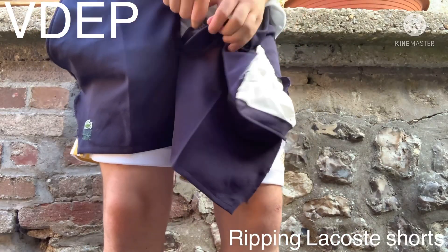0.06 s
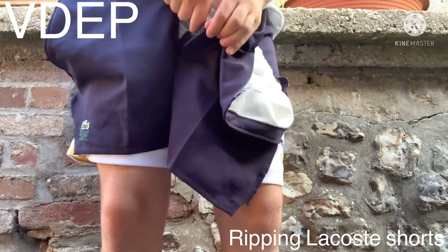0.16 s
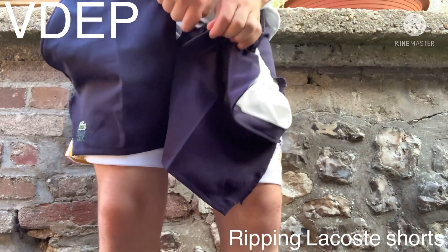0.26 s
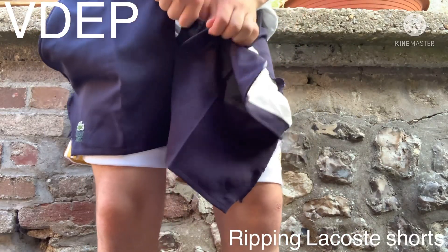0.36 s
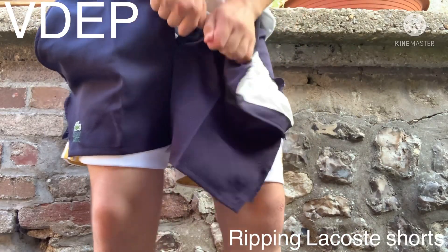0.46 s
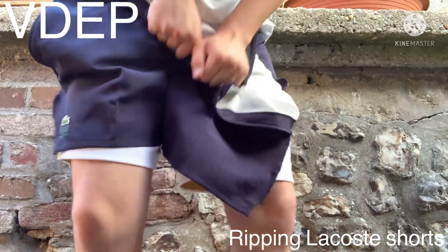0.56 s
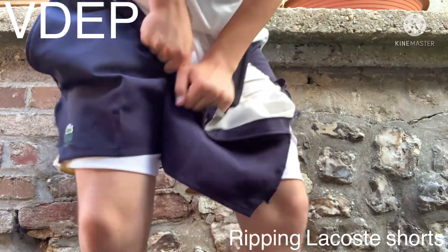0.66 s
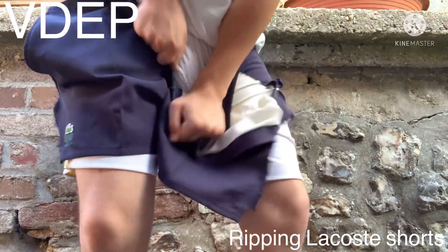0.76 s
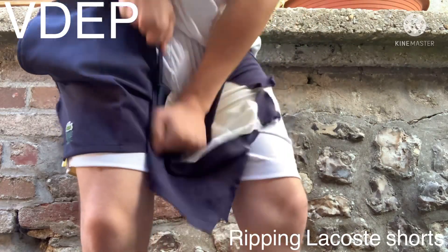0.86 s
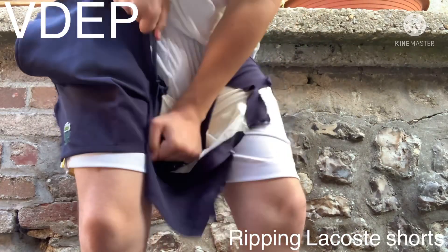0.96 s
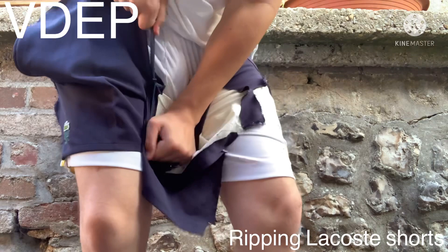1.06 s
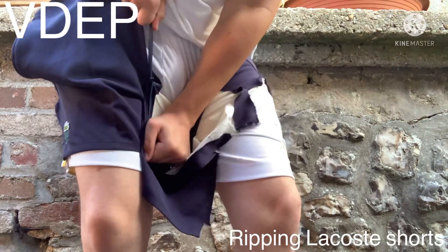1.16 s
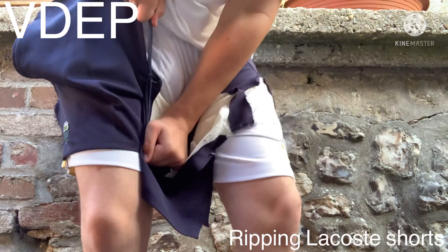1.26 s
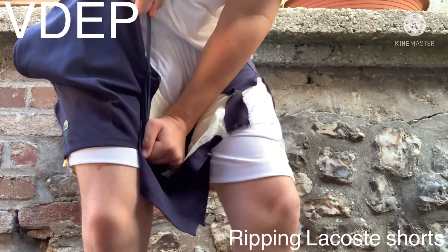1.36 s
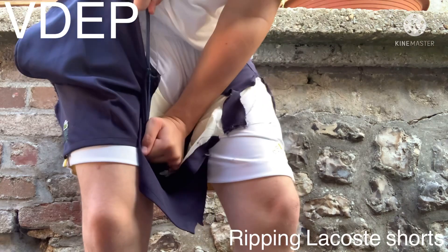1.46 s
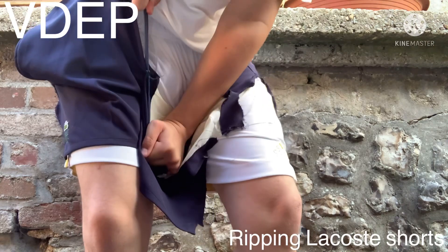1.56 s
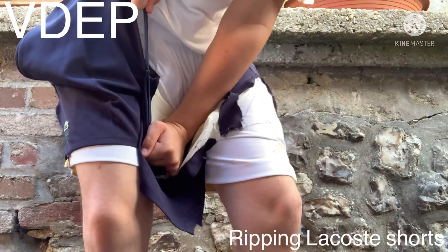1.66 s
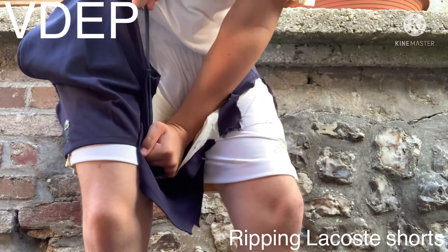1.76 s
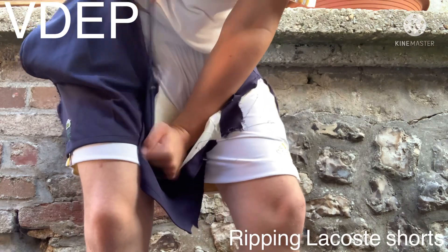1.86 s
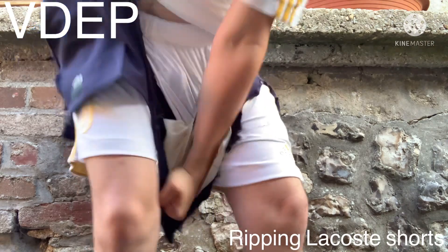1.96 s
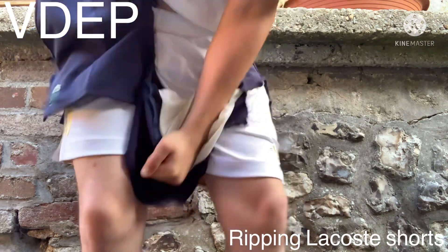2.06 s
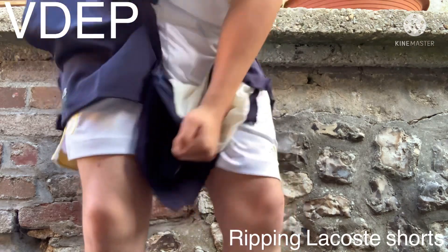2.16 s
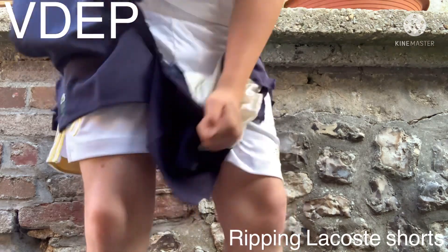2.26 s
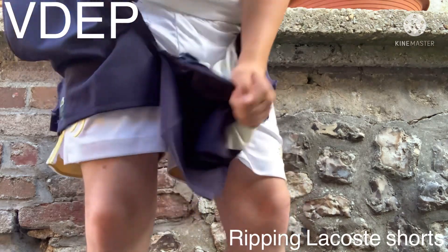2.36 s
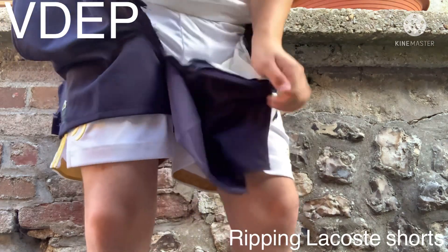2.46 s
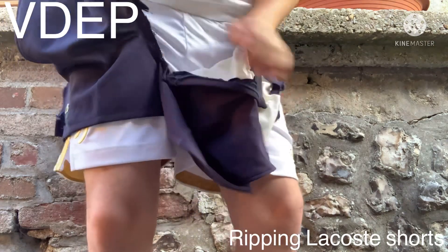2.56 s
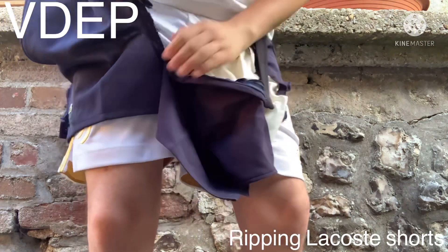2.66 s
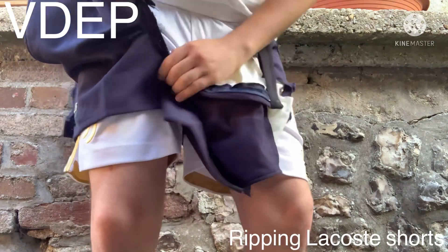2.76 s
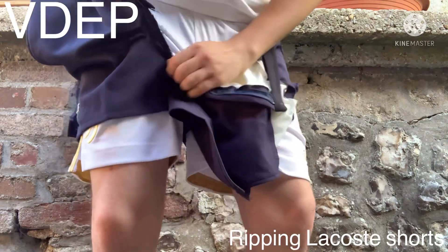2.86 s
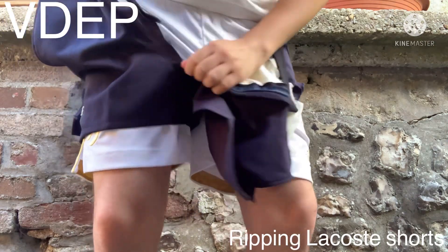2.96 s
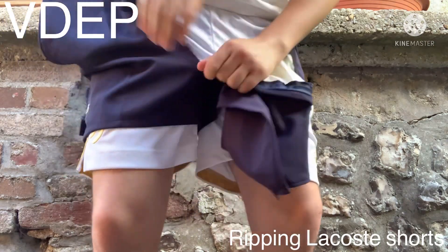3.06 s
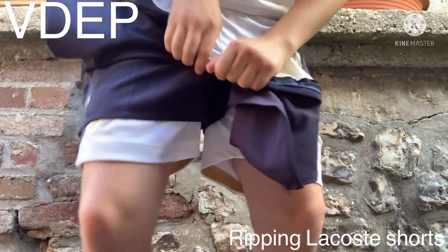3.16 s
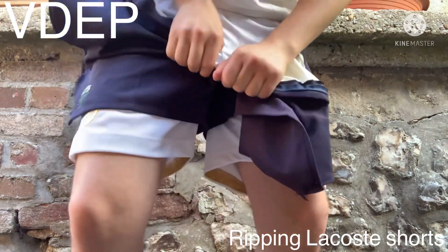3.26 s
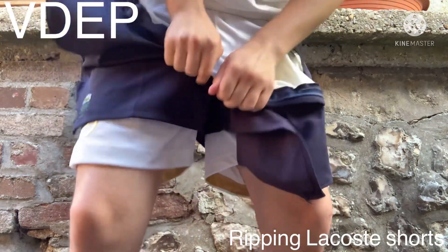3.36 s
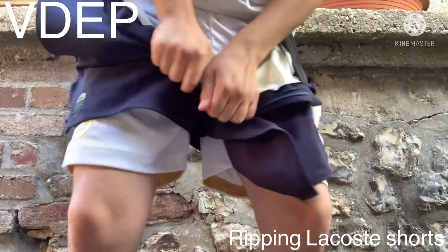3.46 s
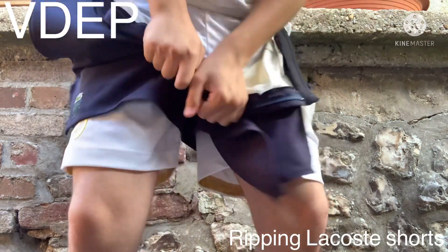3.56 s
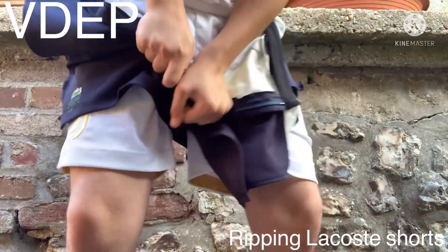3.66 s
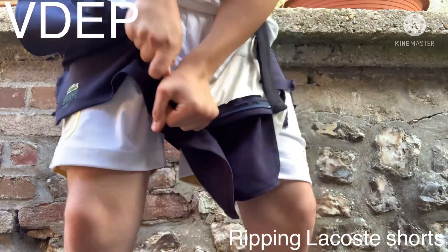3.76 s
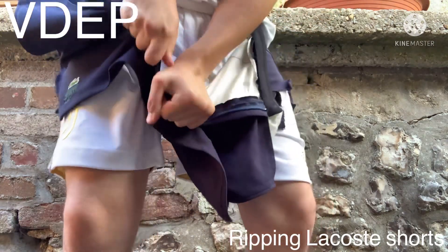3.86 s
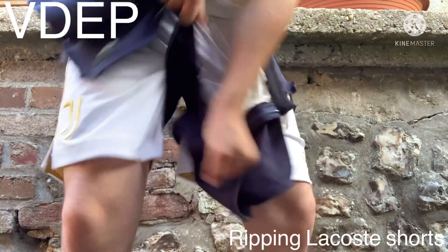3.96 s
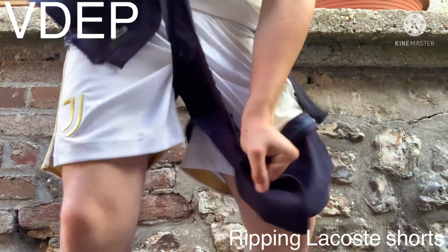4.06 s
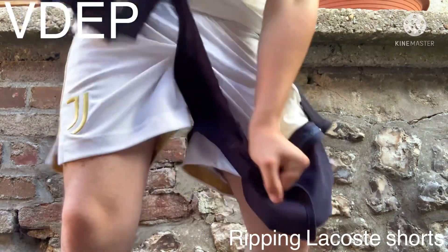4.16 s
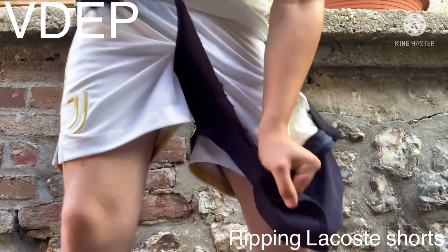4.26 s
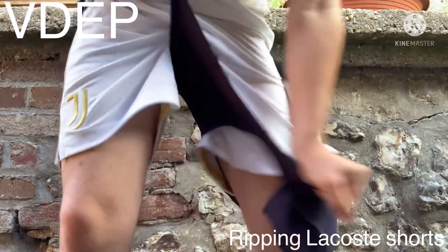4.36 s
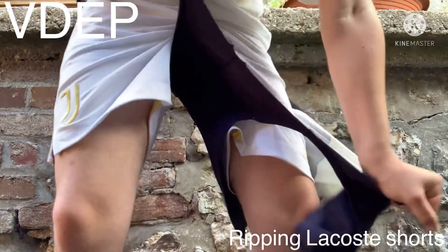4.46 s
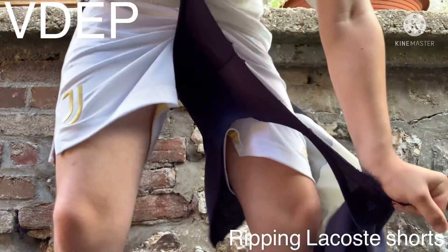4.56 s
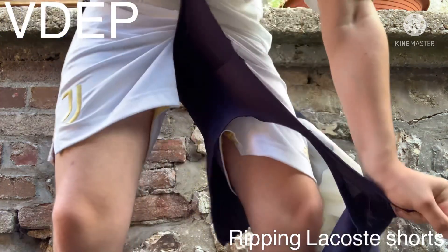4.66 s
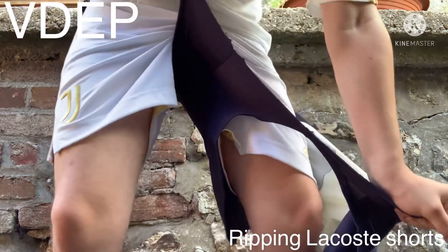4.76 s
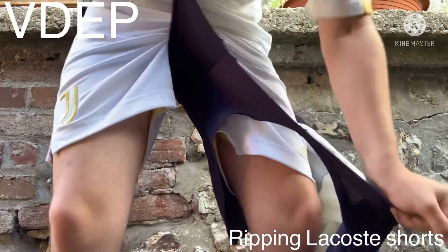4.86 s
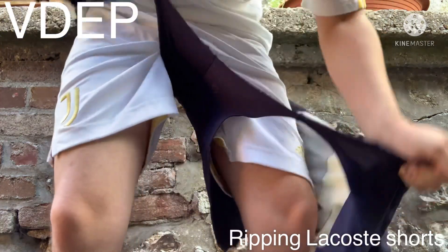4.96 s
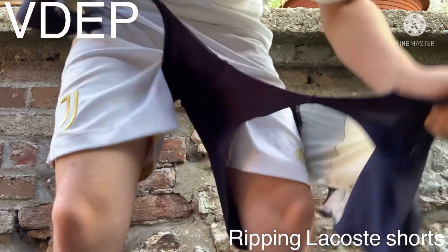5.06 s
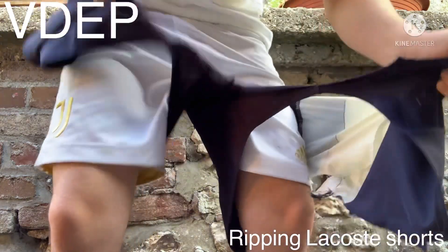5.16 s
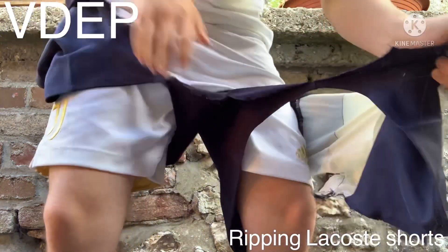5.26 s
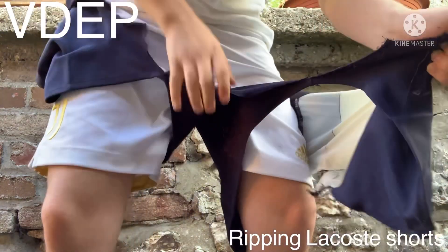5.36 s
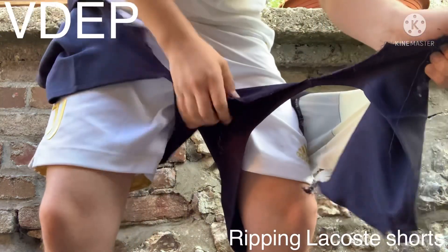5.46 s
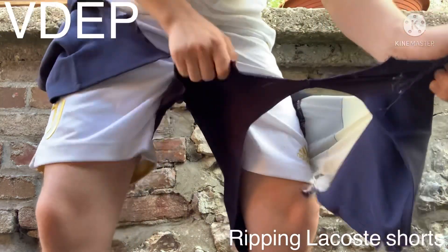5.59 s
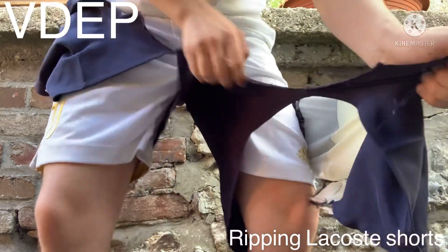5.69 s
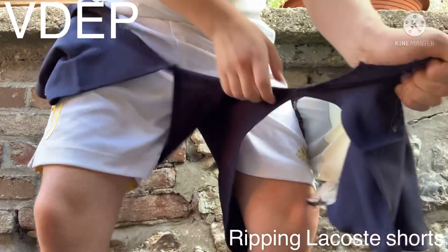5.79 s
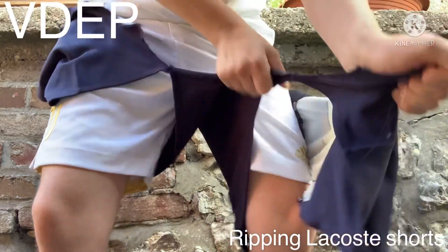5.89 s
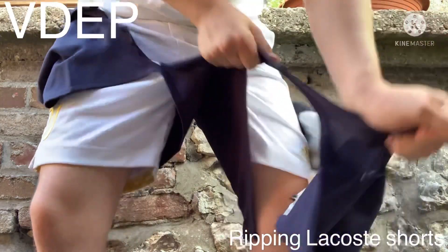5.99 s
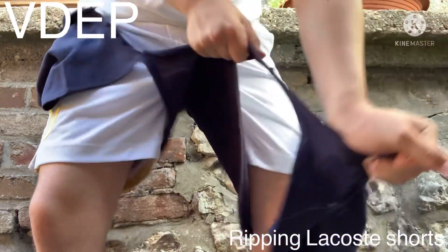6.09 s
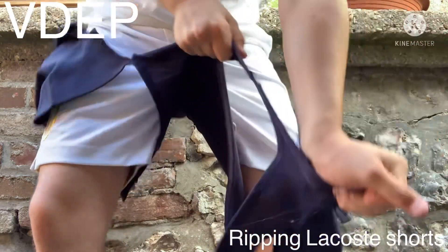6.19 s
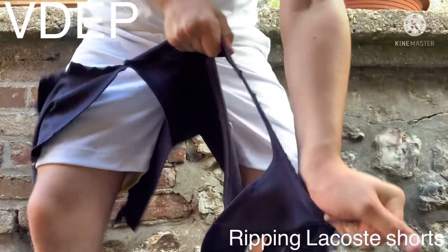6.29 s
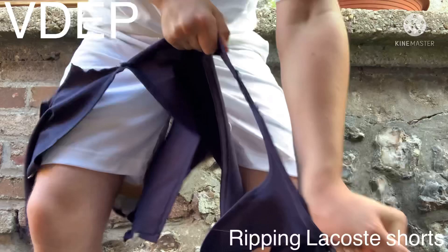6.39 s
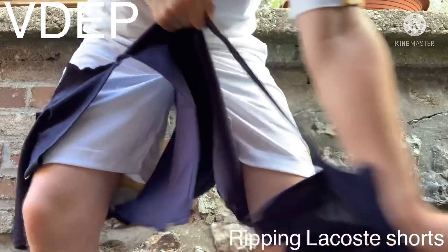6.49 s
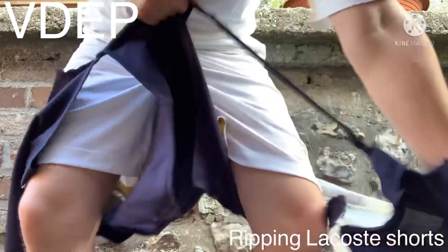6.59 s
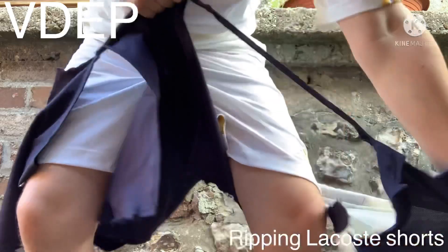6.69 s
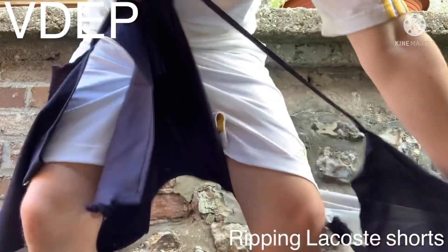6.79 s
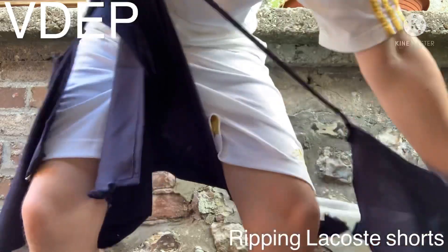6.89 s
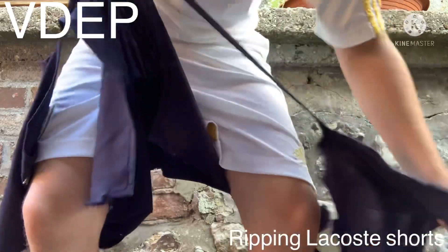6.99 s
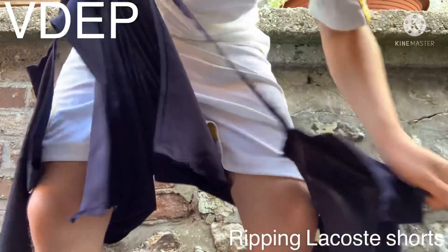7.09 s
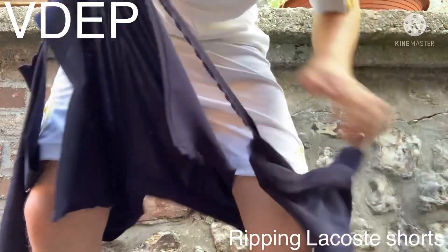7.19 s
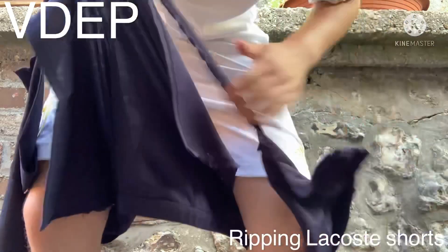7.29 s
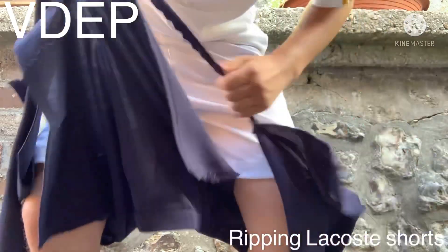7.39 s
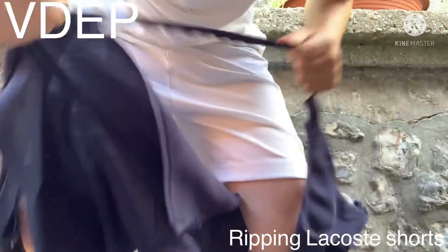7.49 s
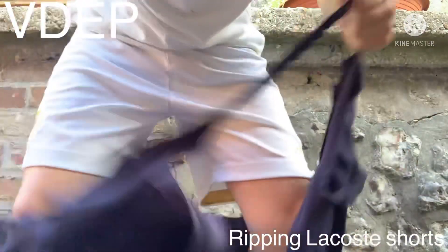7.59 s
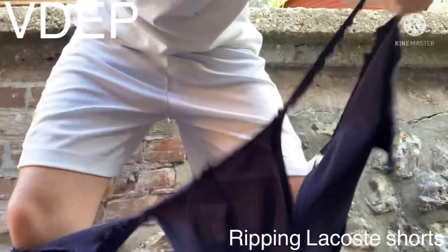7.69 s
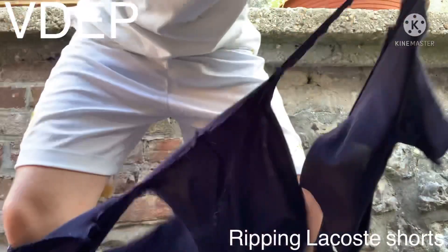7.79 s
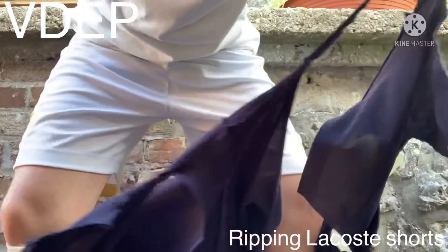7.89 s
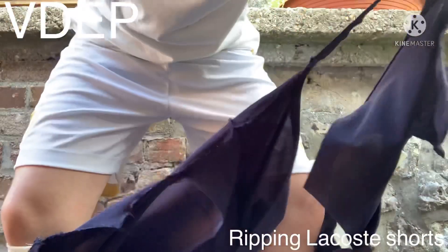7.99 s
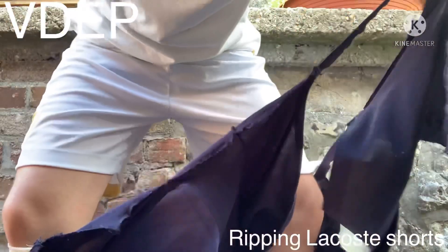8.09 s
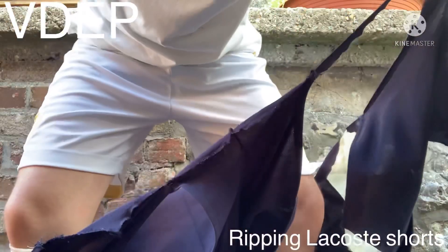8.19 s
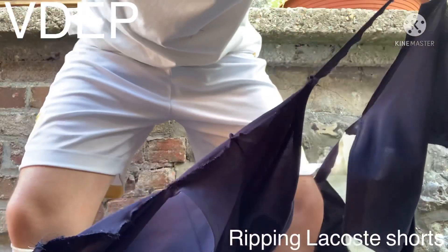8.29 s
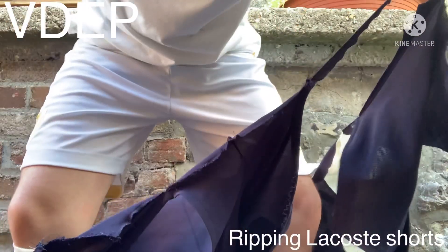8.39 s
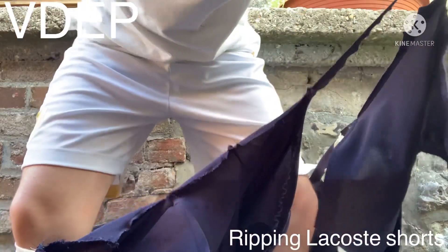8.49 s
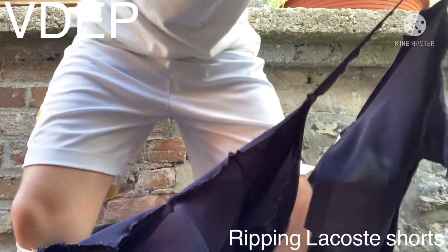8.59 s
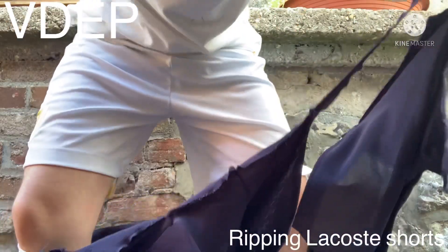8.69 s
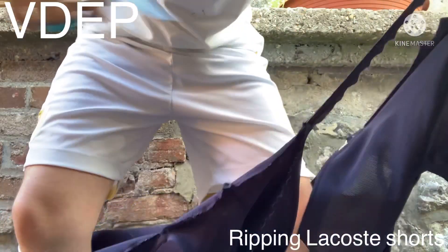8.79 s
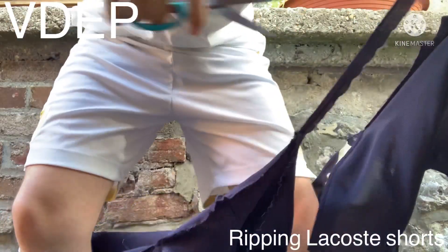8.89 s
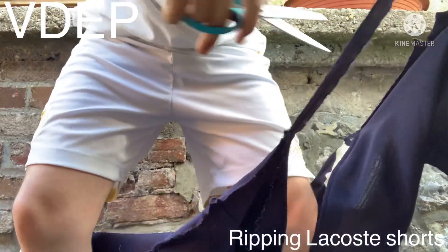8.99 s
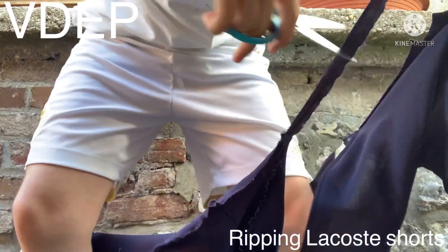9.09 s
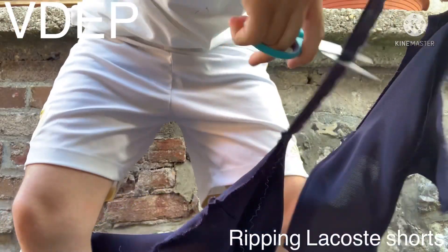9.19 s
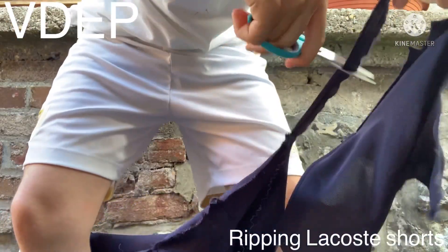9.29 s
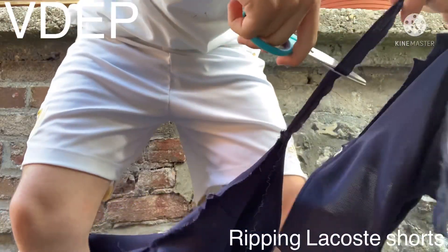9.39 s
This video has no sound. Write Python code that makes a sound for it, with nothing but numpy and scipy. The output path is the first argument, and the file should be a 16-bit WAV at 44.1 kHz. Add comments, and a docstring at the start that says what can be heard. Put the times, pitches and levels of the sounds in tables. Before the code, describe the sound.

Close fabric tearing, quick popping threads with low cloth booms and rustles, a distant engine droning, ending in dull fumbling and metal clicks.

```python
"""A far bird hoots over faint traffic and a distant engine's drone as shorts begin to tear, close by.
Threads snap one by one or in fast runs: each is a short puff of noise, and the taut cloth twangs in
a quick falling chirp. Jerked cloth booms low and soft strokes rustle. Then a hand on the left fumbles
for scissors: dull noise knocks, low thumps, a grainy drag and bright steel clinks. A stone wall and
the yard scatter the near sounds, which reach the two ports of a microphone."""
import sys
import numpy as np
from scipy import signal
from scipy.fft import rfft, irfft
from scipy.io import wavfile
from scipy.ndimage import uniform_filter1d

SR = 44100
rng = np.random.default_rng(int(sys.argv[2]) if len(sys.argv) > 2 else 0)


def dump(signal):
    """Clip the signal to [-1, 1] and save it as 16-bit WAV at the path in sys.argv[1]."""
    limited = np.clip(np.atleast_2d(signal).T, -1, 1)
    pcm = np.round(limited * 32767).astype(np.int16)
    wavfile.write(sys.argv[1], SR, pcm)


N = 416304  # length of the sound in samples
HZ, TIME = np.fft.rfftfreq(N, 1 / SR), np.arange(N) / SR
EDGE_HZ = 16200  # top of the frequency range here


def amp(db):
    """Turns decibels into a gain."""
    return 10 ** (np.asarray(db) / 20)


def evened(x):
    """Scales a signal to an rms (average strength) of 1."""
    return x / np.sqrt(np.mean(x ** 2) + 1e-20)


def read(points):
    """Spreads a table of (Hz, value) over all frequencies."""
    hz, value = np.transpose(points)
    return np.interp(np.log(HZ + 1), np.log(hz + 1), value)


def follow(rows, t):
    """Reads the columns of a curve at the times t."""
    s, *columns = np.transpose(rows)
    return [np.interp(t, s, c) for c in columns]


def add(mix, s, sound):
    """Mixes a sound in at s seconds."""
    part = mix[:, round(s * SR):][:, :sound.shape[-1]]
    part += sound[..., :part.shape[1]]


def band(x, lo_hz, hi_hz, order=2):
    """Band-pass filter that keeps the power of white noise."""
    hi_hz = min(hi_hz, SR / 2 - 1)
    sos = signal.butter(order, [lo_hz, hi_hz], "band", fs=SR, output="sos")
    return signal.sosfilt(sos, x) * np.sqrt(SR / 2 / (hi_hz - lo_hz))


def coloured(x, spectrum):
    """Shapes x with a table of (Hz, dB), then scales it to rms 1."""
    return evened(irfft(rfft(x) * amp(read(spectrum)), N))


def noise(size=N):
    """White noise, unrelated at the two ports."""
    return rng.standard_normal((2, size))


def burst(rise, decay, size=3000):
    """A puff of noise with the energy of a 2 ms sound at rms 1; rise and decay in seconds."""
    t = np.arange(size) / SR
    puff = noise(size) * (1 - np.exp(-t / rise)) * np.exp(-t / decay)
    return evened(puff) * np.sqrt(.002 * SR / size)


def threads(rows):
    """Each break gives a tick, a crack and a flutter of the weave (diffuse), and a twang (direct)."""
    # Resonances of the held cloth and cupped fists.
    # Each row: centre in Hz, width in Hz, relative level in dB.
    cloth = [(860, 160, 1), (1620, 650, -2.5), (2880, 200, -14), (4100, 360, -15.5)]
    tick_s, crack_s = 0.00041, 0.00097  # decay of an ordinary break
    thickness = 0.3  # thick threads twang harder and part more slowly
    tick, crack, edge, flutter, flap, ring = np.zeros((6, 2, N))
    for s, crack_db, tick_db, twang_db, hz in rows:
        thick = amp(thickness * max(twang_db + 38, 0))
        add(tick, s, amp(crack_db + tick_db) * burst(rise=.0001, decay=tick_s * thick))
        puff = amp(crack_db) * reflected(burst(rise=0.0002, decay=crack_s * thick))
        add(crack, s, puff)
        add(edge, s, amp(0.35 * tick_db) * puff)  # the bright half follows the tick's level
        shake = amp(twang_db) * min(700 / hz, 1)  # a tighter patch moves less cloth
        add(flutter, s, shake * burst(rise=0.00023, decay=0.0018))
        add(flap, s, shake * burst(rise=0.0037, decay=0.016))
        add(ring, s, amp(twang_db + 5) * twang(hz))
    body = sum(amp(db) * band(flutter, hz - width / 2, hz + width / 2, order=1)
               for hz, width, db in cloth)
    slack = amp(-13) * band(flap, 110, 640) + amp(-9) * band(flap, 150, 280)
    split = amp(-9.0) * band(crack, 1200, 2700) - amp(-6.0) * band(edge, 2700, 6100)
    return band(tick, 6300, 16000) + split + body + slack, ring


def reflected(puff, share=0.65, longest=0.0008):
    """A quick echo, as off fists and folds, gives each snap or knock its own hollow colour."""
    lag = round(rng.uniform(0.064, 1) * longest * SR)
    echo = np.pad(puff, ((0, 0), (lag, 0)))[:, :puff.shape[1]]
    return (puff + share * echo) / np.sqrt(1 + share ** 2)


def twang(hz, sharpness=2.5, size=3000):
    """In taut cloth short waves arrive first: a falling chirp, a little earlier at the right port."""
    crest_cycles = 2.2  # periods until the chirp is loudest
    end = 0.93  # final pitch as a share of hz
    glide, settle = 2.3, 0.4  # extra pitch at the start, in hz; its decay as a share of the time to the crest
    left_delay = rng.uniform(0, 0.00025)
    t = np.maximum(np.arange(size) / SR - [[left_delay], [0]], 0)
    u = t * hz / crest_cycles
    turns = crest_cycles * (end * u + glide * settle * (1 - np.exp(-u / settle)))
    return np.sin(2 * np.pi * (turns + rng.random())) * (u * np.exp(1 - u)) ** sharpness


def weave(start, length, crest, crack_db, tick_db, twang_db, change_db, per_s=520, spread_db=5.0):
    """In a run, fine threads of uneven strength break at a rate of hundreds a second."""
    rise_db, fade_db = 3.5, 13.5  # a run swells to its crest and dies away
    s = np.arange(0, length, 1 / per_s)
    u, crest = s / length, np.clip(crest, .01, .99)
    late, strong, tight = rng.standard_normal((len(s), 3)).T
    swell_db = -rise_db * np.maximum(1 - u / crest, 0)
    swell_db = swell_db - fade_db * np.maximum((u - crest) / (1 - crest), 0) ** 0.69
    strength_db = swell_db + spread_db * np.clip(strong, -2, 1.6)
    # the same columns as a table of single snaps
    return np.transpose([start + s + .3 * late / per_s,
                         crack_db + strength_db,
                         np.full(len(s), tick_db),
                         twang_db + strength_db + change_db * (u - .5),
                         740 * np.exp(.3 * tight)])


def fibres(rows, count=3):
    """A thread is a bundle: weaker single fibres give around it, most of them just after."""
    spread_s, fibre_db, fibre_twang_db = 0.012, -14, -15  # time spread, and levels against the thread
    s, crack_db, tick_db, twang_db, hz = np.repeat(rows, count, axis=0).T
    late, strong = rng.random((len(s), 2)).T
    return np.transpose([s + spread_s * (late - .22),
                         crack_db + fibre_db + 8 * (strong - .6),
                         tick_db - 3,
                         twang_db + fibre_twang_db,
                         hz])


def jerks_and_thumps(glide=0.82, settle=0.0021, rise=0.0017, size=9000):
    """Low booms and thumps sound like a slack drum skin: fading tones whose pitch drops at once."""
    # Low booms of the jerked cloth, and low thumps as the hand fumbles.
    # Each row: start in seconds, level in dB, settled pitch in Hz, time to fade by 60 dB in seconds.
    booms = [(0.8562, -19, 209, 0.087), (0.8966, -23, 280, 0.13), (1.192, -21, 213, 0.039),
             (1.881, -12, 226, 0.04), (4.313, -19.5, 314, 0.027), (4.356, -15, 375, 0.017),
             (4.381, -18.5, 318, 0.025), (8.032, -23.5, 140, 0.09), (8.136, -24, 227.3, 0.063),
             (8.165, -27, 92, 0.25), (8.219, -23, 265, 0.057)]
    out, t = np.zeros((2, N)), np.arange(size) / SR
    for s, db, hz, t60 in booms:
        turns = hz * (t + glide * settle * (1 - np.exp(-t / settle)))
        add(out, s, amp(db - 60 * t / t60) * (1 - np.exp(-t / rise)) * np.sin(2 * np.pi * turns))
    return out


def swish():
    """Loose cloth swings once, fluttering, with a faint narrow whistle perhaps from a car's tyres."""
    middle_s, length_s, level_db = 7.22, 0.56, -57
    swing = np.cos(np.pi * np.clip((TIME - middle_s) / length_s, -.5, .5)) ** 2
    flutter = amp(2.8 * evened(band(noise(), 7.2, 40))[0])
    air = band(noise(), 980, 1580)
    whistle = amp(-7.5) * band(noise(), 2330, 2470)  # perhaps the tyres of a passing car
    return amp(level_db) * swing * flutter * (air + whistle)


def fumbling():
    """Dull knocks with a hard clack on top, and the grainy drag of the scissors over their ledge."""
    # Knocks of the hand. Each row: start in seconds, clack level in dB, body level in dB,
    # body pitch in Hz, thump level in dB (all levels before the mix below).
    knocks = [(7.9011, -14, -20.5, 646, -27), (7.937, -45, -35, 500, -30), (7.955, -25.5, -27, 594, -29),
              (7.99, -23, -46, 950, -29), (8.0026, -20, -14.5, 1010, -23.5), (8.115, -31.5, -35, 890, -29),
              (8.137, -32, -30, 570, -37), (8.179, -37, -34.5, 980, -38), (8.191, -28, -36.5, 613, -29),
              (8.288, -32.5, -31.5, 950, -30.5), (8.438, -35, -45, 950, -42),
              (9.307, -40.5, -60, 1500, -59.5)]
    # Loudness of the drag. Each row: time in seconds, level in dB before the mix below.
    drag_level = [(7.898, -41.5), (8.02, -37), (8.07, -49.5), (8.245, -62), (8.27, -45), (8.33, -44),
                  (8.40, -43.5), (8.445, -38.5), (8.473, -51)]
    # Tone colour of the drag. Each row: frequency in Hz, relative level in dB.
    drag_colour = [(60, 2), (130, 5.5), (300, 3.5), (780, -4), (980, 6.5), (1300, -14.5), (1900, -8),
                   (2200, -5.5), (2550, -9.5), (4500, -14.5), (7000, -13.5), (15000, -24.5)]
    rebound_s, rebound_db = 0.015, -17.5  # each knock bounces once
    clack, body, thump = np.zeros((3, 2, N))
    for s, clack_db, body_db, hz, thump_db in knocks:
        for at, db in (s, 0), (s + rebound_s, rebound_db):
            add(clack, at, amp(clack_db + db) * reflected(burst(rise=0.0016, decay=0.0031)))
            knock = band(burst(rise=0.0019, decay=0.005), hz * 0.89, hz * 1.05, order=1)
            add(body, at, amp(body_db + db) * knock)
        add(thump, s, amp(thump_db) * burst(rise=0.0032, decay=0.023))
    hard = amp(-2.5) * band(clack, 1700, 4200) + amp(-12) * band(clack, 7000, 15800)
    dull = body + amp(3.5) * band(thump, 65, 323)
    grains = noise() * amp(4.1 * np.minimum(rng.exponential(1, N), 5))
    times, drag_db = np.transpose(drag_level)
    stick_slip = amp(3.55 * evened(band(noise(), 40, 113))[0])
    drag = coloured(grains, drag_colour) * stick_slip * np.interp(TIME, times, amp(drag_db), 0, 0)
    return (hard + dull + drag) * amp([[2.5], [-2.5]])  # louder on the left


def scissors():
    """Steel on steel: a bright click and a short ring of the blades, which shifts with the grip."""
    # Clinks. Each row: start in seconds, level in dB, decay in seconds.
    clinks = [(7.956, -29, 0.0012), (8.136, -28.5, 0.003), (8.4295, -30, 0.001), (8.628, -23, 0.0016),
              (8.648, -19, 0.00088), (8.658, -29, 0.001)]
    # Ringing of the blades. Each row: pitch in Hz before the grip shifts it, width in Hz likewise,
    # level in dB against the click.
    blades = [(3020, 320, -22.5), (4140, 500, -20.5)]
    out = np.zeros((2, N))
    for s, db, decay in clinks:
        click = amp(db) * burst(rise=0.00057, decay=decay)
        grip = np.exp(0.099 * rng.standard_normal())
        ring = sum(amp(level_db) * band(click, grip * (hz - width / 2), grip * (hz + width / 2))
                   for hz, width, level_db in blades)
        add(out, s, band(click, 8200, EDGE_HZ) + ring)
    add(out, 8.755, shear())
    return out


def shear():
    """One blade scrapes along the other: a rough squeak falls as the contact point travels."""
    length_s, level_db = 0.021, -29.5
    from_hz, to_hz, rough_below_hz = 16000, 5500, 1450
    u = np.linspace(0, 1, round(length_s * SR))
    hz = from_hz + (to_hz - from_hz) * u
    rough = evened(signal.lfilter(*signal.butter(2, rough_below_hz, fs=SR), noise(len(u))))
    squeak = rough * np.sin(2 * np.pi * np.cumsum(hz) / SR)
    return amp(level_db) * np.sqrt(abs(np.sin(np.pi * u))) * squeak


def yard(x, near_db=-5.0, near_t60=0.094, far_db=-18.5, far_t60=0.44, count=3):
    """Uneven scatter from wall and ground, on paths that shift with the body, then a faint yard tail."""
    t = np.arange(SR // 2) / SR
    wet = amp(far_db) * wash(x[0], far_t60)
    for k in range(count):
        uneven_db = 1.1 * evened(band(noise(len(t)), 40, 400))[0]
        tail = noise(len(t)) * amp(-60 * t / near_t60 + uneven_db) * (t > .0016)
        share = np.sqrt(2 / count) * np.cos(np.pi * (7 * TIME + k / count))  # paths take turns
        path = amp(near_db) * tail / np.linalg.norm(tail[0])
        wet = wet + signal.oaconvolve(x[:1] * share, path, axes=1)[:, :N]
    # echo colour: (Hz, dB)
    colour = [(200, -1.0), (900, -4.0), (2500, 1.5), (5500, 1.5), (9000, -3.5), (16000, -5.0)]
    return irfft(rfft(wet) * amp(read(colour)), N)


def wash(x, t60, blur_octaves=0.45, size=256):
    """Many late echoes merge into smooth noise that keeps only the broad colour of the sound."""
    z, grain = signal.stft(x, nperseg=size)[2], signal.stft(noise(), nperseg=size)[2]
    octave = np.log2(np.arange(len(z)) + .5)
    blur = np.exp(-((octave[:, None] - octave) / blur_octaves) ** 2)
    keep = amp(-60 * size / SR / t60)  # share of the power left after each step of half a window
    power = signal.lfilter([0, 0, 1 - keep], [1, -keep], (blur / blur.sum(0)) @ abs(z) ** 2)
    return signal.istft(np.sqrt(power) * grain / grain.std())[1][:, :N]


def ports(x):
    """Turns two unrelated channels into what a close pair of microphone ports hears."""
    # How alike the ports hear. Each row: frequency in Hz, likeness from 0 to 1.
    likeness = [(50, 0.62), (300, 0.43), (900, 0.092), (2500, 0.19), (6000, 0.31), (7800, 0.77), (9000, 1),
                (11500, 0.8), (14000, 0.69), (16000, .7)]
    # Phase between the ports. Each row: frequency in Hz, lead of the left port in radians.
    lead = [(60, 0), (850, -.45), (2400, -.85), (5100, -1.9), (7100, -3.5), (8900, -3.1), (10400, -2),
            (12100, -.85), (13600, -.05), (15900, .45)]
    left, other = rfft(x)
    same = np.clip(read(likeness), -1, 1)
    right = (same * left + np.sqrt(1 - same ** 2) * other) * np.exp(-1j * read(lead))
    return irfft(np.array([left, right]), N)


def engine():
    """Only the firing note of a distant engine carries this far; it climbs, drops back and swells."""
    # Each row: time in seconds, pitch in Hz.
    pitch = [(0, 48.8), (1.35, 56.7), (3.05, 61.8), (4.5, 67.8), (5.27, 68), (5.56, 55.3), (7.6, 56.1),
             (9.1, 52)]
    # Each row: time in seconds, level in dB before a slight waver and left-right balance.
    level = [(0.0, -56), (2.89, -48.5), (3.97, -44.5), (4.26, -49.5), (6.47, -36.5), (6.68, -51),
             (6.91, -33), (7.36, -27.5), (7.84, -49.5), (8.75, -43.5), (8.99, -60), (9.1, -47), (9.44, -55)]
    (hz,), (db,) = follow(pitch, TIME), follow(level, TIME)
    waver = evened(band(noise(), 0.6, 3, order=1))[0]
    note = np.sqrt(2) * np.sin(2 * np.pi * np.cumsum(hz) / SR)
    return amp(db + 0.25 * waver) * note * amp([[-1.2], [1.1]])


def hoots():
    """A far bird calls like a dove, in short, soft, slightly falling notes."""
    # The middle of each hoot in seconds.
    middles = [0.035, 0.16, 0.72]
    middle_hz, length_s, level_db = 507, 0.15, -58
    out, u = np.zeros((2, N)), np.linspace(-.5, .5, round(length_s * SR))
    tone = np.sin(2 * np.pi * np.cumsum(middle_hz * (1 - 0.13 * u)) / SR)
    note = amp(level_db) * np.cos(np.pi * u) ** 2 * tone
    for s in middles:
        add(out, max(s - length_s / 2, 0), note)
    return out


def background():
    """Far traffic, its low rumble, and soft grainy strokes of cloth and, once, of the scissors."""
    # Far traffic, with a car passing. Each row: time in seconds, level in dB.
    traffic_level = [(1.1, -57), (2.3, -55), (3.7, -55), (4.9, -50.5), (5.6, -51.5), (6.3, -48),
                     (7.25, -42.5), (7.8, -47.5), (9.2, -55.5)]
    # Tone colour of the traffic. Each row: frequency in Hz, relative level in dB.
    traffic_colour = [(53, -35), (90, 1.5), (130, -7), (300, -1), (401, -12), (692, -10), (961, -9),
                      (1990, -25.5), (2390, -25.5), (2670, -27.5), (7000, -36.5), (9100, -60.5),
                      (15400, -120)]
    # Soft strokes: cloth sliding through the hands, and at 9.3 s a bright scrape of the scissors.
    # Each row: middle in seconds, length in seconds, level in dB, sheen (treble) level in dB over that.
    strokes = [(0.587, 1, -67, -20), (1.598, 1, -60.5, -7), (2.154, 0.52, -62.5, -6.5),
               (2.971, 0.09, -63.5, -5), (3.316, 0.32, -65, -18), (5.058, 0.41, -59.5, -23.5),
               (5.998, 0.4, -70.5, -4), (6.991, 0.65, -60, -1), (8.857, 0.13, -71, -22),
               (9.3, 0.053, -63.5, 9.5)]
    traffic = amp(follow(traffic_level, TIME)[0]) * coloured(drifting(noise()), traffic_colour)
    rumble = amp(-53.0) * band(noise(), 46, 86.4)
    brush, sheen = np.zeros((2, N))
    for s, length, db, sheen_db in strokes:
        stroke = amp(db) * np.cos(np.pi * np.clip((TIME - s) / length, -.5, .5)) ** 2
        brush, sheen = brush + stroke, sheen + stroke * amp(sheen_db)
    grain = evened(noise() * amp(1.7 * np.minimum(rng.exponential(1, N), 6)))
    grain = grain * amp(2 * evened(band(noise(), 8, 60))[0])
    # the treble keeps a very faint steady hiss between strokes
    grainy = band(grain * brush, 1300, 8600) + band(grain * (sheen + amp(-80.5)), 6000, EDGE_HZ)
    return traffic + rumble + grainy


def drifting(x, patchy_db=2.5):
    """Narrow patches of a far sound swell and sink, each for about a fifth of a second."""
    z = signal.stft(x, nperseg=2048)[2]
    patches = uniform_filter1d(rng.standard_normal(z.shape[1:]), size=4, axis=0)  # across pitch
    patches = uniform_filter1d(patches, size=9, axis=1)  # across time
    return signal.istft(z * amp(patchy_db * evened(patches)))[1][:, :N]


def scene():
    """Cloth and scissors in the middle, fumbling to the left, with echoes of both from the yard."""
    # Single threads and stitches. Each row: start in seconds, crack level in dB, tick level in dB over
    # the crack, twang level in dB, twang pitch in Hz (levels and pitch before shaping in the functions).
    snaps = [(0.163, -40.5, -13, -48, 478), (0.6893, -24, -12, -35, 740), (0.7031, -24, -12.5, -36, 680),
             (0.7235, -17, -6.5, -39, 740), (0.7364, -18, -5, -29.5, 723), (0.76, -31, -17, -34.5, 690),
             (0.779, -31.5, -1.5, -38.5, 968.0), (0.8508, -27.5, -2.5, -37, 770),
             (0.8546, -28, -5, -26, 763), (0.8587, -18.5, -4.5, -33, 590), (0.8964, -16, -7, -27.5, 664),
             (1.174, -38.5, -0.5, -46, 1010), (1.1916, -28, 6.5, -26, 808), (1.4051, -32, -25, -29.5, 950),
             (1.5021, -42, -0.5, -47.5, 790), (1.556, -33, 9.5, -51, 910), (1.6629, -44, -0.5, -72, 790),
             (1.737, -36.5, -2, -45, 790), (1.8793, -23.5, 8.5, -18.5, 770), (1.9503, -25.5, 1, -28.5, 605),
             (2.187, -48, -1, -40.5, 2600), (2.4387, -68, -13, -48, 680), (3.899, -27, 0, -40, 755),
             (3.9508, -32, -14, -24, 722), (4.0235, -25.5, 3, -33, 680), (4.0724, -27.5, 2, -28, 695.0),
             (4.1084, -18, -18.5, -32.5, 830), (4.1222, -23.5, -6.5, -33, 651.0),
             (4.148, -26.5, -2, -28, 780), (4.1742, -27.5, 1, -29, 694), (4.201, -27.5, 0, -30, 640),
             (4.3112, -29.5, 1, -29, 600), (4.3249, -27.5, 5, -29.5, 740), (4.3372, -29.5, 5, -34.5, 722.0),
             (4.3556, -30.5, 6.5, -28.5, 770), (4.37, -29, 1.5, -25.5, 680), (4.3801, -29, 7, -24, 694),
             (4.401, -21, -1.0, -33.5, 646), (4.428, -27.5, -4.5, -39.5, 543),
             (4.6572, -27.5, 6, -31, 766.0), (4.69, -21, -6.5, -28.5, 700), (6.1549, -22, -0.5, -43, 695.0),
             (6.1677, -25.5, 0.5, -37.5, 666), (6.1837, -26.5, 7, -43, 574), (6.1943, -24.5, 2.5, -39, 620),
             (6.34, -31, 1.5, -55, 554.0), (6.359, -30, 5, -47, 642.0), (6.3843, -21.5, 3, -43, 1012.0),
             (6.4001, -29.5, 8, -42.5, 484.0), (6.4117, -26, 1, -41.5, 493.0), (6.42, -25, 6, -45.5, 678.0),
             (6.4664, -21, 0.5, -35.5, 986.0), (6.508, -26.5, 0.5, -34, 714), (6.514, -34, 1.5, -31, 700),
             (6.5397, -34, -1, -32, 750), (6.5583, -32, 8.5, -29, 620), (6.5755, -24, -6.5, -32.5, 710),
             (6.5873, -31.5, -1, -32.5, 640), (6.62, -28.5, 0, -33, 640), (6.6602, -25.5, -4, -32.5, 790),
             (6.7096, -26, -1.5, -32.5, 680), (6.7358, -37.5, 9.5, -30.5, 657),
             (6.755, -31.5, 3.5, -33.5, 720), (6.7688, -35.5, 9, -29.5, 624), (6.787, -35.5, 1, -33.5, 686),
             (6.8117, -32.5, 0.5, -33.5, 684), (6.8619, -26.5, -2.5, -31, 700)]
    # Runs of tearing weave. Each row: start in seconds, length in seconds, crest as a share of the
    # length, crack level in dB, tick level in dB over the crack, twang level in dB,
    # twang change in dB over the run (positive: the twang grows).
    runs = [(1.883, 0.05, 0.34, -31.5, 1.5, -33.5, -2), (3.907, 0.11, 0.56, -28, -3.5, -40, -6),
            (4.077, 0.11, 0.042, -35.5, -3, -40, 18.5), (4.319, 0.093, 0.92, -48, 11, -43.5, 2),
            (6.425, 0.12, 0.12, -31, 7.5, -37, 13)]
    breaks = np.vstack([snaps, fibres(snaps)] + [weave(*row) for row in runs])
    diffuse, ring = threads(breaks)
    diffuse, ring, hand = diffuse + scissors(), ring + jerks_and_thumps(), fumbling()
    centre = ports(diffuse + yard(diffuse + ring) + background() + swish()) * amp([[-.3], [.3]])
    left = ports(hand + yard(hand, near_db=-9.5, far_db=-44.0)) * amp([[0], [-3]])
    return centre + left + ring + engine() + hoots()


def record(dry):
    """The band limit of the recorder: a smooth low-pass filter removes the highest treble."""
    lowpass = signal.firwin(255, EDGE_HZ, window=("kaiser", 8), fs=SR)
    return signal.oaconvolve(dry, lowpass[None], "same", axes=1)


dry = scene()
out = record(dry)
dump(out)
```